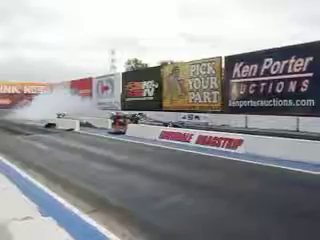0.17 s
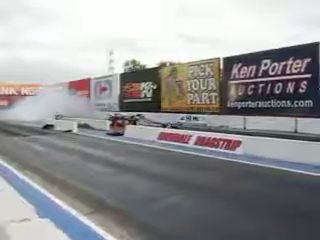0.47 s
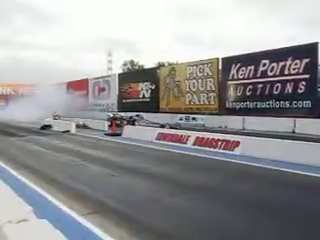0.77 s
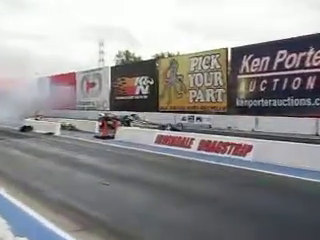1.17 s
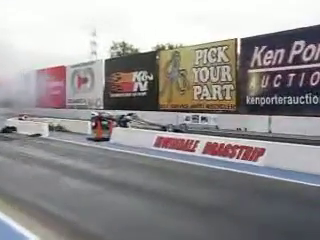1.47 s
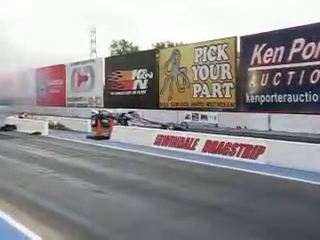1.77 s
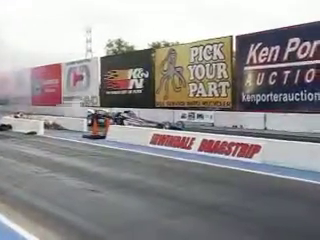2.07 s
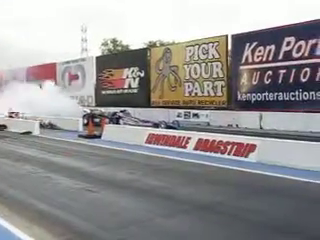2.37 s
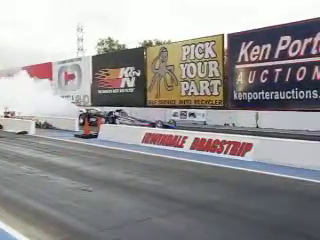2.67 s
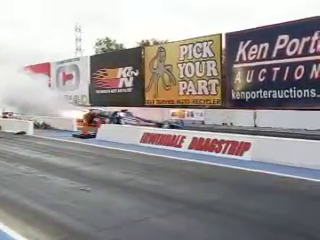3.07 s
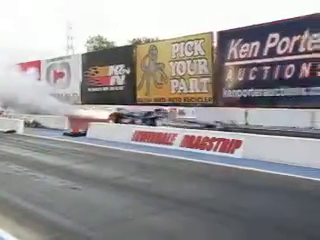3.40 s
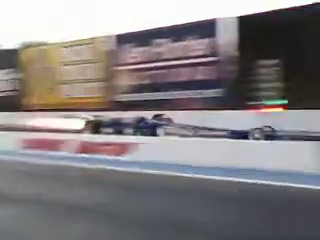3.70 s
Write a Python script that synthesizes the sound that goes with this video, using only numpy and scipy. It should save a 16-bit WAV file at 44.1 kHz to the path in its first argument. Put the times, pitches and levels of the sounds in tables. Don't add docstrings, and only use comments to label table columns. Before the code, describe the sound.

A jet engine whines piercingly, spools up, then its afterburner thumps alight into an overloaded roar.

```python
import sys
import numpy as np
from scipy import signal
from scipy.io import wavfile

SR = 44100
rng = np.random.default_rng(int(sys.argv[2]) if len(sys.argv) > 2 else 0)


def wrap_up_sound(samples):
    columns = np.atleast_2d(samples).T
    tamed = np.clip(columns, -1, 1)
    steps = np.round(tamed * 32767).astype(np.int16)
    wavfile.write(sys.argv[1], SR, steps)


def ratio_of_db(decibels):
    return 10 ** (np.asarray(decibels, float) / 20)


N = 169344

# time [s], blade rate [Hz].
BLADE_RATE = [(0, 5894), (.7, 5905), (.85, 6015), (1.05, 6220), (1.4, 6095), (1.72, 6142), (2.03, 6529),
              (2.3, 6820), (2.5, 6860), (2.9, 6825), (3.84, 6915)]
# time [s], level [dB], left-right [dB].
WHINE_LEVEL = [(.04, -1, -5), (.17, 8, -1), (.3, 4, -8.5), (.46, 3, -6.5), (.51, -1.5, -9), (.55, 5, 2),
               (.59, -2, -6), (.72, 5.5, -3), (.77, -4, -1), (.84, 4.5, -8.5), (.92, 2.5, 0),
               (.95, -5, -13), (1.33, -0.5, -4), (1.5, 7, -6.5), (1.6, 0, -8), (2.05, -4.5, 1),
               (2.4, -6, -2), (2.9, -5.5, -2)]
# multiple of shaft rate, level under the whine's mean [dB].
SHAFT_ORDERS = [(9, -29), (12, -27), (14, -34), (17, -22), (19, -26), (20, -26), (21, -19.5), (22, -25),
                (26, -33), (29, -28), (31, -29)]
# frequency [Hz], level [dB per Hz].
INTAKE_SPECTRUM = [(30, -4), (280, 4), (500, -3.5), (2200, -1), (4000, -6), (6000, -1), (9000, -15),
                   (16000, -48)]
# frequency [Hz], level [dB per Hz].
EXHAUST_SPECTRUM = [(30, -18), (150, 2), (270, 4), (450, -3), (1500, -3.5), (3000, -2.5), (6000, -20),
                    (16000, -40)]
# frequency [Hz], level [dB per Hz].
BURNER_SPECTRUM = [(30, -6), (270, 5.5), (550, 1), (1200, 0), (2100, 2), (3500, -5.5), (6000, -9.5),
                   (16000, -26.5)]
# frequency [Hz], left-right correlation [0 to 1].
LIKENESS = [(30, .55), (90, .82), (300, .85), (1000, 0.93), (2500, 0.72), (6000, 0.4), (10000, .28)]
# frequency [Hz], left-right [dB].
LEAN = [(200, -2.5), (400, -1.5), (900, -0.5), (2400, 2.5), (4400, -4.5), (15000, 7.5)]
# start [s], signed strength [linear], length [s].
PRESSURE_PUSHES = [
    (2.933, -19, 0.004),
    (2.938, 4, .005),
    (2.9556, 9, .003),
    (2.963, -3.5, 0.0027),
    (3.011, 3, 0.013),
]

BLADES = 24
SHIMMER_DB, SHIMMER_HZ, BLUR_HZ = 4.5, 32, 7
SKIRT_DB, SKIRT_HZ, SKIRT_PITCH_RATIO = -10.5, 480, 0.99
SCATTER_DB, SCATTER_HZ, SCATTER_FOLLOWS = -1, 150, 0.3
OVERTONE_DB, OVERTONE_DB_PER_KHZ, OVERTONE_BLUR_HZ = -16, -22, 44.9
SAW_BEST_HZ, SAW_SPAN_HZ, SAW_BOOST_DB = 6200, 180, 7
EXHAUST_DB, EXHAUST_DB_PER_KHZ, REFERENCE_HZ = -3.5, 10, 6290
PATCHY_DB, GUST_DB = 0.68, 0.44
ABEAM_S, ABEAM_BASS_DB_PER_S, ABEAM_MID_DB_PER_S, ABEAM_MID_HZ = 3.2, -11, 6, 2100
PIPE_HZ, PIPE_WIDTH_HZ, PIPE_DB, PIPE_FOLLOWS = 272.9, 54, -8.5, 0.6
LIGHT_S, BURNER_RISE_S, BURNER_DB = 2.933, 0.09, 5
WHINE_MASK_DB, MASK_RISE_S = -14, 0.003
BOOM_DB, BOOM_HZ, BOOM_DECAY_S, BOOM_RISE_S = 9, 130, 0.11, 0.015
DRIVE_DB, CLIP_HARDNESS = -1, 2.94
LOW_CUT_HZ, RUMBLE_CUT_HZ, TOP_CUT_HZ = 263, 60, 14000
OUT_DB, OPEN_S, OVERSHOOT_DB, SETTLE_S = -10, 0.0362, 16.5, 0.003


def column(rows, index):
    table = np.array(rows)
    return np.interp(np.arange(N) / SR, table[:, 0], table[:, index])


def at_hz(points, hz):
    table = np.array(points)
    return np.interp(np.log(hz), np.log(table[:, 0]), table[:, 1])


def drift(rate_hz, count=1):
    warmup = SR // 10
    r = np.exp(-2 * np.pi * rate_hz / SR)
    noise = rng.standard_normal((count, N + warmup))
    slow = signal.lfilter([1], [1, -2 * r, r * r], noise)[:, warmup:]
    return slow / slow.std(axis=1, keepdims=True)


def opposed(left_right_db):
    return ratio_of_db(left_right_db / 2 * np.array([[1], [-1]]))


def burner_on(rise_s):
    return 1 - np.exp(-np.maximum(np.arange(N) / SR - LIGHT_S, 0) / rise_s)


def shaft_orders(phase, above_hz):
    flutter = drift(12, count=len(SHAFT_ORDERS))
    saw = 0
    for (order, db), f in zip(SHAFT_ORDERS, flutter):
        saw = saw + ratio_of_db(db + 3.5 * f) * np.sin(phase * order / BLADES + order * order)
    return saw * ratio_of_db(SAW_BOOST_DB * np.exp(-(above_hz / SAW_SPAN_HZ) ** 2))


def whine():
    blade_hz = column(BLADE_RATE, index=1)
    phase = 2 * np.pi * np.cumsum(blade_hz) / SR
    above_hz = blade_hz - SAW_BEST_HZ
    above_khz = np.maximum(above_hz, 0) / 1000
    mask_db = WHINE_MASK_DB * burner_on(MASK_RISE_S)
    path_db = column(WHINE_LEVEL, index=1)
    level_db = path_db + mask_db

    wobble = 2 * np.pi * np.cumsum(drift(39.8, count=2), axis=1) / SR
    shimmer = drift(SHIMMER_HZ, count=3)
    shimmer_db = SHIMMER_DB * (0.53 * shimmer[0] + 0.63 * shimmer[1:])
    tone = ratio_of_db(shimmer_db) * np.sin(phase + BLUR_HZ * wobble[0])

    a, b = drift(SKIRT_HZ, count=2)
    skirt_phase = SKIRT_PITCH_RATIO * phase
    skirt = ratio_of_db(SKIRT_DB) * (a * np.sin(skirt_phase) + b * np.cos(skirt_phase))

    paths = drift(SCATTER_HZ, count=6).reshape(2, 3, N)
    a, b = 0.85 * paths[:, :1] + 0.5 * paths[:, 1:]
    scatter_db = SCATTER_DB + SCATTER_FOLLOWS * path_db + mask_db - 4.5 * above_khz
    scatter = ratio_of_db(scatter_db) * (a * np.sin(phase) + b * np.cos(phase))

    overtone_db = OVERTONE_DB + OVERTONE_DB_PER_KHZ * above_khz + 4.6 * shimmer[1:]
    overtone = ratio_of_db(overtone_db) * np.sin(2 * phase + OVERTONE_BLUR_HZ * wobble[1])

    pan = opposed(column(WHINE_LEVEL, index=2))
    direct = ratio_of_db(level_db) * (pan * tone + skirt)
    side_tones = ratio_of_db(3.5 + 0.28 * level_db + 0.68 * mask_db) * (shaft_orders(phase, above_hz) + overtone)
    return scatter + np.sqrt(2) * (direct + side_tones)


def roar():
    t = np.arange(N) / SR
    exhaust = ratio_of_db(EXHAUST_DB + EXHAUST_DB_PER_KHZ * (column(BLADE_RATE, index=1) - REFERENCE_HZ) / 1000)
    burner = ratio_of_db(BURNER_DB) * burner_on(BURNER_RISE_S)
    gust = drift(12)
    patches = drift(20, count=5)
    passing_s = np.maximum(t - ABEAM_S, 0)
    edges_hz = 25 * 2 ** np.arange(0, 9.6, 0.5)
    white = rng.standard_normal((2, 2, N))
    bands = 0
    for k, (low, high) in enumerate(zip(edges_hz, edges_hz[1:])):
        band = signal.butter(2, [low, high], "band", fs=SR, output="sos")
        mid, side = signal.sosfilt(band, white[k % 2])
        hz = np.sqrt(low * high)
        alike = np.clip(at_hz(LIKENESS, hz), 0, 1)
        power = ratio_of_db(2 * at_hz(INTAKE_SPECTRUM, hz))
        power = power + (exhaust * ratio_of_db(at_hz(EXHAUST_SPECTRUM, hz))) ** 2
        power = power + (burner * ratio_of_db(at_hz(BURNER_SPECTRUM, hz))) ** 2
        bass_db_per_s = ABEAM_BASS_DB_PER_S / (1 + (hz / 500) ** 2)
        mid_db_per_s = ABEAM_MID_DB_PER_S * np.exp(-np.log(hz / ABEAM_MID_HZ) ** 2 * 4)
        level_db = passing_s * (bass_db_per_s + mid_db_per_s) + GUST_DB * gust + PATCHY_DB * patches[k % 5]
        gain = np.sqrt(power) * ratio_of_db(level_db) * opposed(at_hz(LEAN, hz))
        bands = bands + gain * (np.sqrt(1 + alike) * mid + np.sqrt(1 - alike) * side * [[1], [-1]])

    a, b = drift(PIPE_WIDTH_HZ, count=2)
    phase = 2 * np.pi * PIPE_HZ * t
    pipe_gain = ratio_of_db(PIPE_DB + ABEAM_BASS_DB_PER_S * passing_s) * exhaust ** PIPE_FOLLOWS
    pipe = pipe_gain * (a * np.sin(phase) + b * np.cos(phase))
    return bands * ratio_of_db(6) + pipe


def thumps():
    t = np.arange(N) / SR
    low_pass = signal.butter(2, BOOM_HZ, fs=SR, output="sos")
    low = signal.sosfilt(low_pass, rng.standard_normal(N))
    envelope = burner_on(BOOM_RISE_S) * (1 - burner_on(BOOM_DECAY_S))
    total = ratio_of_db(BOOM_DB) * low / low.std() * envelope
    for start_s, strength, length_s in PRESSURE_PUSHES:
        progress = np.clip((t - start_s) / length_s, 0, 1)
        total = total + strength * np.sqrt(np.abs(np.sin(np.pi * progress)))
    return total


def scene():
    return whine() + roar() + thumps()


def band_limit(x):
    return signal.sosfilt(signal.butter(12, 15640, fs=SR, output="sos"), x)


def record(dry):
    x = ratio_of_db(DRIVE_DB) * dry
    x = x / (1 + np.abs(x) ** CLIP_HARDNESS) ** (1 / CLIP_HARDNESS)
    since_open_s = np.arange(N) / SR - OPEN_S
    x = x * (since_open_s > 0)
    for cut_hz in (LOW_CUT_HZ, RUMBLE_CUT_HZ):
        x = signal.lfilter(*signal.butter(1, cut_hz, "high", fs=SR), x)
    x = signal.sosfilt(signal.butter(2, TOP_CUT_HZ, fs=SR, output="sos"), x)
    x = x * ratio_of_db(OUT_DB + OVERSHOOT_DB * np.exp(-np.maximum(since_open_s, 0) / SETTLE_S))
    return band_limit(np.clip(x, -1, 1))


dry = scene()
out = record(dry)
wrap_up_sound(out)
```